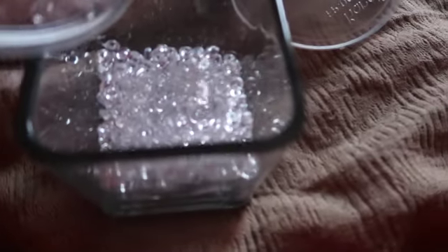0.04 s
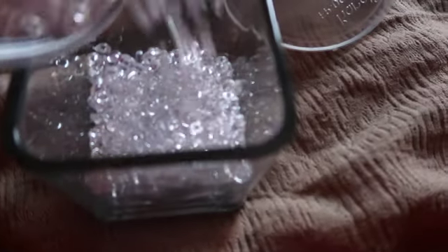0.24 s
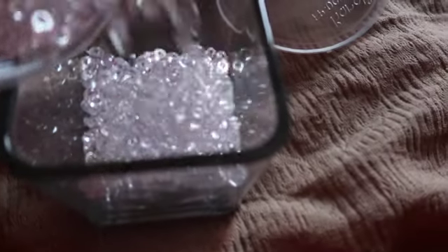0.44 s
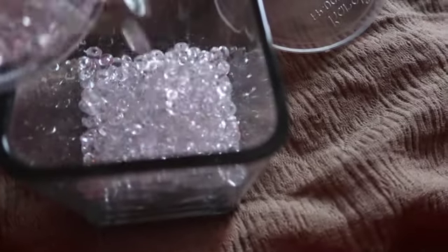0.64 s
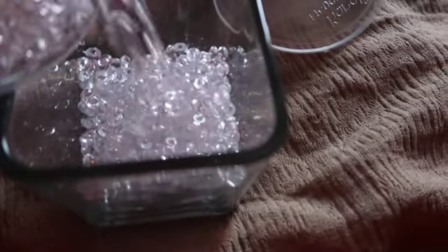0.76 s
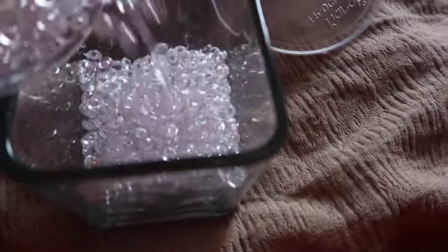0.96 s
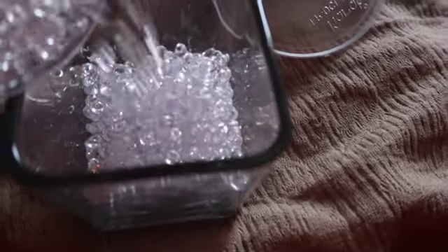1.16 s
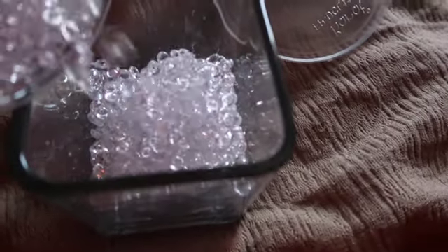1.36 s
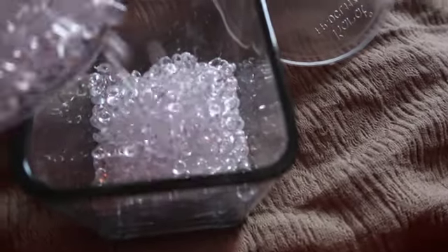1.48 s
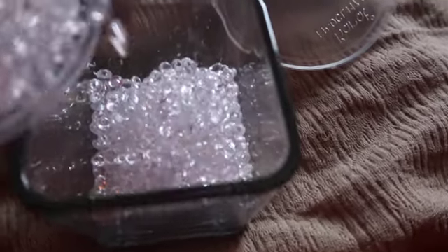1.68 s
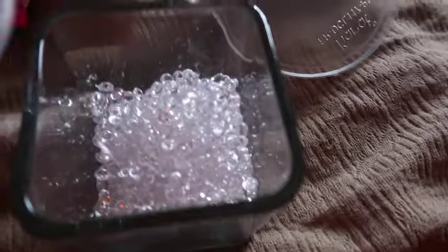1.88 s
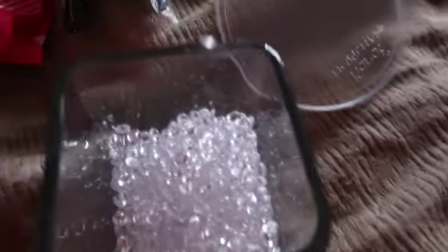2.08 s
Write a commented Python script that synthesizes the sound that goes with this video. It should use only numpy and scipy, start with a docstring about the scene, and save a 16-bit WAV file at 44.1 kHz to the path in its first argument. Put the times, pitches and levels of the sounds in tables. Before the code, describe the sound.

Close-up stereo rattle of small beads streaming into a square glass container on cloth, crisp and hollow at first, breaking into short bursts and single ticks, almost silent, then a duller tumble, with very faint hiss.

```python
"""Beads poured into a glass vessel

Small hard beads pour from a cup into a square glass vessel that stands on a cloth. Bead on bead gives bright
ticks of a few cycles; the heap and the air in the vessel answer with hollow knocks. Both are random showers
plus listed single blows, made by ringing resonances. The stream thins to single beads, stops, and a duller
rush starts again. A close pair of microphone ports hears it, with short reflections, soft thumps, hiss and rumble."""
import sys
import numpy as np
from scipy import signal
from scipy.fft import rfft, irfft
from scipy.io import wavfile

SR = 44100
rng = np.random.default_rng(int(sys.argv[2]) if len(sys.argv) > 2 else 0)


def gain_from_decibels(decibels):
    """Convert decibel values to linear amplitude factors."""
    exponent = np.asarray(decibels, float) / 20
    return 10 ** exponent


def master_out(mix):
    """Clip the mix to full scale and print it as 16-bit PCM to the path in sys.argv[1]."""
    frames = np.transpose(np.atleast_2d(mix))
    ceiling = np.clip(frames, -1, 1)
    pcm = np.round(ceiling * 32767).astype(np.int16)
    wavfile.write(sys.argv[1], SR, pcm)


N = 93403  # length in samples

# The stream of bright ticks, before its gain: (time [s], level [dB], brightness [dB per octave])
TICK_STREAM = [(0.0, -54, 2), (0.01, -38.5, 2), (0.04, -57, -4), (0.049, -45, -1), (0.084, -47, -2.5),
               (0.15, -37, 0.7), (0.46, -36.5, 1.3), (0.67, -40, -1.5), (0.77, -36.5, 0), (0.91, -39, -3),
               (1.05, -39, -3.8), (1.192, -34.5, 0.5), (1.27, -44, -1.5), (1.341, -50, -9),
               (1.458, -38.5, -2.1), (1.54, -59.5, -2.5), (1.54, -48, 3), (1.56, -38.5, -2.5),
               (1.57, -33, -0.5), (1.6, -37, -0.5), (1.631, -60.5, -10), (1.659, -35, 2.8),
               (1.68, -54.5, -1), (1.729, -45, 3.5), (1.75, -61, 2), (1.778, -44, 7), (1.83, -82, -2),
               (1.849, -46.5, 17), (1.87, -83, 0), (1.89, -58.5, 6), (1.955, -78.5, -9), (1.984, -46, -3.5),
               (2.12, -45.5, -1.5)]
# The stream of hollow knocks, before its gain: (time [s], level [dB])
KNOCK_STREAM = [(0.0, -38.5), (0.02, -42), (0.04, -49), (0.09, -45), (0.11, -53.5), (0.21, -37.5),
                (0.25, -43), (0.44, -40.5), (0.51, -46), (0.78, -49), (0.84, -57), (0.85, -45), (0.94, -45),
                (1.01, -44.5), (1.05, -61), (1.18, -46), (1.25, -58), (1.34, -52.5), (1.43, -50),
                (1.52, -70.5), (1.55, -60), (1.64, -69), (1.68, -79), (1.71, -51.5), (1.75, -71),
                (1.78, -55.5), (1.83, -69), (1.85, -55), (1.86, -67), (1.95, -78), (1.99, -69),
                (2.0, -45.5), (2.12, -50)]
# Bright ticks that stand out, before their gain: (time of the crest [s], level [dB], favoured pitch [Hz])
SINGLE_TICKS = [(0.009, -15, 2740), (0.0493, -26.5, 5400), (0.0913, -23, 3380), (0.0934, -26, 2370),
                (0.1127, -21.5, 3230), (0.1152, -20, 6300), (0.1773, -14.5, 5920), (0.2092, -14, 2190),
                (0.3162, -14.5, 5460), (0.317, -18.5, 2900), (0.4415, -13, 2700), (0.5092, -18, 6700),
                (0.5508, -24.5, 5540), (0.6168, -27, 5750), (0.6888, -20, 7240), (0.75, -11.5, 6100),
                (0.8065, -18, 5350), (0.8958, -25.5, 3100), (0.9137, -13, 2500), (0.9299, -20, 3060),
                (0.9431, -20.5, 6800), (0.9854, -25, 5750), (1.005, -16.5, 5600), (1.0048, -19.5, 2930),
                (1.026, -23, 5000), (1.044, -24.5, 5990), (1.0587, -18.5, 5260), (1.1074, -22, 5700),
                (1.1301, -18, 5240), (1.1619, -16.5, 3200), (1.1924, -20.5, 6640), (1.2006, -15, 5400),
                (1.233, -17.5, 5760), (1.2769, -18, 5440), (1.277, -24, 3220), (1.3008, -27, 4530),
                (1.3223, -22, 3580), (1.3746, -23.5, 4040), (1.4186, -27, 5260), (1.4288, -22, 2600),
                (1.4387, -19.5, 5870), (1.455, -17.5, 2740), (1.496, -26.5, 5100), (1.5043, -31, 5100),
                (1.545, -20, 2750), (1.5685, -19, 5740), (1.568, -17, 2720), (1.577, -22.5, 4230),
                (1.5945, -20, 6800), (1.6433, -33, 4700), (1.6483, -31, 3160), (1.655, -19, 4820),
                (1.6551, -19.5, 3200), (1.6665, -24.5, 4600), (1.685, -31.5, 4800), (1.7012, -22, 7200),
                (1.7006, -24.5, 3070), (1.7254, -26, 5070), (1.766, -18.5, 5070), (1.7773, -34, 4670),
                (1.7862, -35.5, 4670), (1.8491, -37, 6400), (1.8884, -33, 11700), (1.9864, -23.5, 4000),
                (1.994, -24.5, 4620), (2.0142, -18.5, 7950), (2.0733, -25, 4360), (2.0794, -22, 6800),
                (2.0875, -25, 4000), (2.0962, -25.5, 6100)]
# Hollow knocks that stand out, before their gain: (time of the crest [s], level [dB], favoured pitch [Hz])
SINGLE_KNOCKS = [(0.007, -38, 1680), (0.016, -27.5, 1180), (0.0238, -30, 860), (0.0485, -33.5, 1340),
                 (0.0925, -35, 1310), (0.154, -32.5, 1300), (0.2097, -27.5, 930), (0.7069, -30.5, 1420),
                 (0.7812, -34, 1110), (0.9134, -30, 1470), (0.9606, -29, 1430), (1.1038, -38, 1200),
                 (1.312, -29.5, 1300), (1.644, -45.5, 1010), (1.7669, -40.5, 1670), (1.7778, -41.5, 1050),
                 (1.7987, -47, 1010), (1.851, -42.5, 1000), (1.9893, -29, 1270), (2.03, -34, 1140),
                 (2.049, -34.5, 895), (2.0535, -41, 940), (2.074, -37, 850), (2.0888, -31.5, 1370),
                 (2.0875, -30.5, 755), (2.1, -33, 1040), (2.108, -33.5, 560)]
# Soft thumps on the microphone body, before their gain: (time of the crest [s], level [dB])
THUMPS = [(0.412, -37.5), (0.469, -57.5), (1.529, -71), (1.617, -60)]
# How strongly ticks sound at each pitch: (frequency [Hz], relative level [dB])
TICK_COLOUR = [(1000, -20), (1300, -14), (1800, -15), (2300, -9), (3250, -7), (4100, -12), (5200, -5.5),
               (6200, -4.5), (8000, -9), (10500, -10.5), (13000, -11), (15500, -32)]
# How strongly knocks sound at each pitch: (frequency [Hz], relative level [dB])
KNOCK_COLOUR = [(450, -23), (700, -13), (950, -10.5), (1200, 3.5), (1500, -4), (2000, 6.5), (3000, -16.5)]
# Colour of the steady hiss: (frequency [Hz], relative level [dB per Hz])
HISS_COLOUR = [(150, -11), (400, -9.5), (3000, -11.5), (6000, -19), (15500, -33)]
# How full the vessel is: (time [s], share [0 to 1])
HEAP = [(0.45, 0), (0.78, .6), (1.5, .8), (1.95, .9)]

TICKS_PER_S, KNOCKS_PER_S = 3500, 1500
# Each of a ring's two passes falls 60 dB in this many cycles, and in no less than this time
TICK_CYCLES, KNOCK_CYCLES, RING_LEAST_S = 14, 11, .002
SIZE_SPREAD_DB = 3.6
# Each blow favours one pitch, by this much and this widely; the other shares scatter at random
OWN_PITCH_DB, OWN_WIDTH_OCT, PITCH_SCATTER_DB = 12, .22, 5.0
# Single blows favour their pitch by this much more, more narrowly, and scatter less
SINGLE_FAVOUR_DB, SINGLE_WIDTH_OCT, SINGLE_SCATTER_DB = 4, .14, 3.5
# Gains from table level to blow strength
TICK_STREAM_DB, KNOCK_STREAM_DB, TICK_DB, KNOCK_DB = -4.5, -9.5, 4, 10.5
# The right port hears most blows later; the delay fades out in the bass
LAG_SAMPLES, LAG_SPREAD_SAMPLES, LAG_FROM_HZ = 1.714, 0.68, 1100
LEFT_DB, PAN_SPREAD_DB = 0.96, 2.5  # left louder than right, on average and by chance
THINNING = .5  # share of stream ticks gone in a full vessel
AIR_HZ, AIR_FAVOUR_DB = 1060, 12  # pitch of the air above the heap, and extra favour when full
DIP_HZ = [1450, 2350]  # band that weakens as the vessel fills
RUSH_S, RUSH_TILT_DB = 1.96, -9.5  # from this time the knocks are deeper, in dB per octave
BODY_CUT_HZ = 444  # beads so small hardly radiate below this
ROOM_DB, ROOM_T60_S = -16, .07
ROOM_SIDE, ROOM_SIDE_FROM_HZ = 0.73, 4800
HISS_DB = -81.5
RUMBLE_DB, RUMBLE_HZ, RUMBLE_LUMPS_DB = -106, 160, 5
THUMP_HZ, THUMP_T60_S = 102, 0.019
CUTOFF_HZ = 15650
OPPOSITE = np.array([[1], [-1]])  # plus on the left, minus on the right


def rms_one(x):
    """Scales a sound to an rms of 1."""
    return x / np.sqrt(np.mean(x ** 2) + 1e-20)


def at_hz(points, hz):
    """Reads a colour table between its points, on a log frequency axis."""
    table_hz, table_db = np.transpose(points)
    return np.interp(np.log(hz), np.log(table_hz), table_db)


def cut(x, hz, kind, order):
    """Butterworth filter: keeps the low, the high or a band."""
    return signal.sosfilt(signal.butter(order, hz, kind, fs=SR, output="sos"), x)


def ring(blows, hz, t60):
    """A resonance applied twice: a blow swells for a moment, then dies; a unit blow gets energy 1."""
    radius = gain_from_decibels(-60 / (t60 * SR))
    angle = 2 * np.pi * hz / SR
    poles = [1, -2 * radius * np.cos(angle), radius * radius]
    sos = [[1, 0.001, -1] + poles, [1, 0.027, -2.5] + poles]
    unit = signal.sosfilt(sos, np.arange(4000) == 0)
    # the tiny offset keeps the filter's numbers from becoming slow to compute
    return signal.sosfilt(sos, blows + 1e-18) / np.sqrt(np.sum(unit ** 2))


def place(at, sizes):
    """Puts impulses between samples, each as a short windowed sinc."""
    taps = np.floor(at).astype(int)[:, None] + np.arange(-5, 7)
    away = taps - at[:, None]
    shape = np.sinc(away) * np.cos(np.pi * away / 12) ** 2
    inside = np.clip(taps, 0, N).ravel()
    return np.bincount(inside, (shape * sizes[:, None]).ravel(), N + 1)[:N]


def clicks(s, db, own_hz, tilt_db, colour, cycles, extra_db, single_count, count):
    """Each blow shares its energy among all resonances, most near its own pitch, from its own spot."""
    pitches = np.geomspace(colour[0][0], colour[-1][0], count)
    chance = rng.standard_normal((len(s), count + 2))
    sign = rng.choice([-1, 1], (len(s), count))
    lag = LAG_SAMPLES + LAG_SPREAD_SAMPLES * chance[:, -1]
    pan_db = LEFT_DB + PAN_SPREAD_DB * chance[:, -2]

    single = np.arange(len(s)) < single_count  # the single blows come first in the list
    sign[single] = 1
    width_oct = np.where(single, SINGLE_WIDTH_OCT, OWN_WIDTH_OCT)[:, None]
    scatter_db = np.where(single, SINGLE_SCATTER_DB, PITCH_SCATTER_DB)[:, None]
    octaves_away = np.log2(pitches / own_hz[:, None])
    nearness = np.exp(-.5 * (octaves_away / width_oct) ** 2)
    favour_db = (OWN_PITCH_DB + extra_db + SINGLE_FAVOUR_DB * single)[:, None] * nearness

    # resonances lie evenly in octaves, so higher ones stand for wider bands
    colour_db = at_hz(colour, pitches) + 10 * np.log10(pitches)
    slope_db = colour_db + np.outer(tilt_db, np.log2(pitches / 4000))
    shares = gain_from_decibels(slope_db + favour_db + scatter_db * chance[:, :count])
    sizes = sign * shares * (gain_from_decibels(db) / np.linalg.norm(shares, axis=1))[:, None]

    out = np.zeros((2, N))
    for k, hz in enumerate(pitches):
        t60 = max(cycles / hz, RING_LEAST_S)
        start = (s - t60 / np.log(1000)) * SR  # early, so that the swell crests on time
        half_lag = .5 * lag / (1 + (LAG_FROM_HZ / hz) ** 4)
        left = place(start - half_lag, sizes[:, k] * gain_from_decibels(.5 * pan_db))
        right = place(start + half_lag, sizes[:, k] * gain_from_decibels(-.5 * pan_db))
        out += ring(np.array([left, right]), hz, t60)
    return out


def shower(rate, low_hz, high_hz):
    """Many blows at random moments, with random sizes (few large, many small) and pitches."""
    when, size, pitch = rng.random((int(rate * N / SR), 3)).T
    # the last term makes up for sparser blows
    size_db = -SIZE_SPREAD_DB * np.log(np.maximum(size, .02)) + 10 * np.log10(SR / rate)
    return when * N / SR, size_db, low_hz * (high_hz / low_hz) ** pitch


def fullness(s):
    """The rising heap, which sharpens the hollow colour; zero in the last rush."""
    return np.clip(np.interp(s, *np.transpose(HEAP)), 0, 1) * (s < RUSH_S)


def with_singles(singles, gain_db, stream):
    """Puts the listed single blows, with their gain, ahead of the stream's blows."""
    return np.hstack([np.transpose(singles) + [[0], [gain_db], [0]], stream])


def ticks():
    """Bead on bead: hard contacts ring briefly and brightly, in a stream and as loud single beads."""
    t, level_db, stream_tilt_db = np.transpose(TICK_STREAM)
    s, db, hz = shower(TICKS_PER_S, low_hz=2100, high_hz=13060)
    db = db + TICK_STREAM_DB + np.interp(s, t, level_db)
    kept = rng.random(len(s)) > THINNING * fullness(s)
    s, db, hz = with_singles(SINGLE_TICKS, TICK_DB, np.array([s, db, hz])[:, kept])
    in_stream = np.arange(len(s)) >= len(SINGLE_TICKS)
    tilt_db = np.interp(s, t, stream_tilt_db) * in_stream
    return clicks(s, db, hz, tilt_db, TICK_COLOUR, TICK_CYCLES, 0, len(SINGLE_TICKS), count=36)


def knocks():
    """The hollow answer of heap and vessel, drawn towards the pitch of the air as the heap rises."""
    s, db, hz = shower(KNOCKS_PER_S, low_hz=640, high_hz=1565)
    hz = hz * (AIR_HZ / hz) ** fullness(s)
    db = db + KNOCK_STREAM_DB + np.interp(s, *np.transpose(KNOCK_STREAM))
    s, db, hz = with_singles(SINGLE_KNOCKS, KNOCK_DB, [s, db, hz])
    tilt_db = RUSH_TILT_DB * (s > RUSH_S)
    extra_db = AIR_FAVOUR_DB * fullness(s)
    return clicks(s, db, hz, tilt_db, KNOCK_COLOUR, KNOCK_CYCLES, extra_db, len(SINGLE_KNOCKS), count=16)


def room(x):
    """A short dying spray of reflections; the two sides differ only in the treble."""
    t = np.arange(int(ROOM_T60_S * SR)) / SR
    fade = gain_from_decibels(-60 * t / ROOM_T60_S) * (t > .001)
    mid, side = rng.standard_normal((2, len(t))) * fade
    spray = mid + ROOM_SIDE * cut(side, ROOM_SIDE_FROM_HZ, "high", order=2) * OPPOSITE
    spray = rms_one(spray) / np.sqrt(len(t))
    return gain_from_decibels(ROOM_DB) * signal.fftconvolve(x, spray, axes=1)[:, :N]


def background():
    """Faint steady hiss from coloured noise, mostly common to both sides, over a lumpy low rumble."""
    white = rng.standard_normal((4, N))
    pair = white[0] + 0.47 * white[1] * OPPOSITE
    hz = np.maximum(np.arange(N // 2 + 1) * SR / N, 10)
    hiss = rms_one(irfft(rfft(pair) * gain_from_decibels(at_hz(HISS_COLOUR, hz)), N))
    lumps = gain_from_decibels(RUMBLE_LUMPS_DB * rms_one(cut(white[2], 4.9, "low", order=2)))
    low_pair = white[3] + 0.27 * white[1] * OPPOSITE
    rumble = rms_one(cut(low_pair, [60, RUMBLE_HZ], "band", order=2))
    return gain_from_decibels(HISS_DB) * hiss + gain_from_decibels(RUMBLE_DB) * lumps * rumble


def thumps():
    """Low, quickly damped pushes on the microphone body, a little louder on the left."""
    s, db = np.transpose(THUMPS)
    start = (s - THUMP_T60_S / np.log(1000)) * SR
    return 5.5 * ring(place(start, gain_from_decibels(db)), THUMP_HZ, THUMP_T60_S) * gain_from_decibels(OPPOSITE)


def scene():
    """Beads in the vessel with their reflections, thumps and background."""
    beads = cut(ticks() + knocks(), BODY_CUT_HZ, "high", order=4)
    dip = cut(beads, DIP_HZ, "band", order=1)
    beads = beads - fullness(np.arange(N) / SR) * dip
    return beads + room(beads) + thumps() + background()


def top_cut(x):
    """Nothing passes above about 16.5 kHz."""
    return signal.sosfilt(signal.butter(12, 16470, fs=SR, output="sos"), x)


def record(dry):
    """Cuts the very top of the treble steeply and finishes the mix."""
    mix = cut(dry, CUTOFF_HZ, "low", order=30)
    return top_cut(mix)


dry = scene()
out = record(dry)
master_out(out)
```